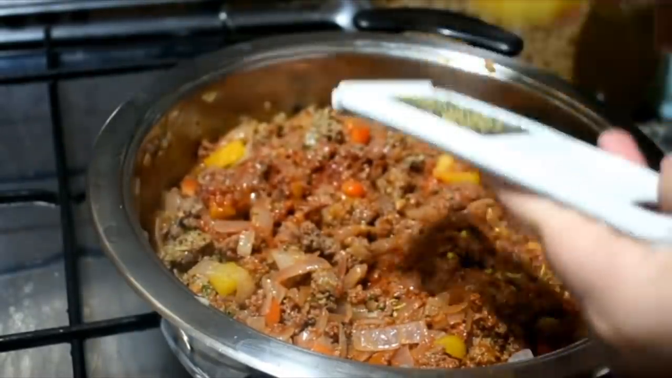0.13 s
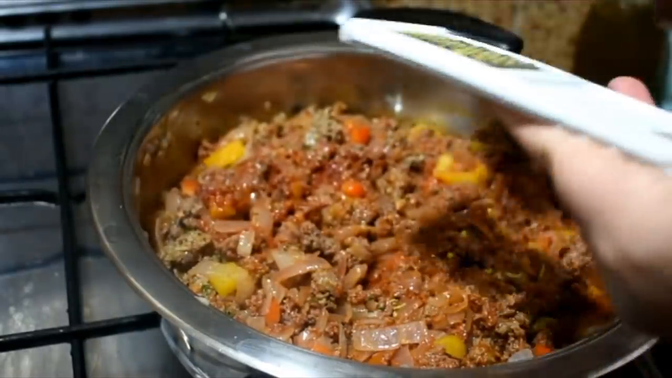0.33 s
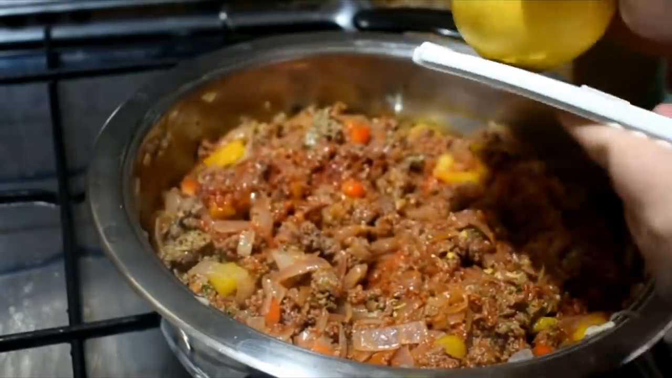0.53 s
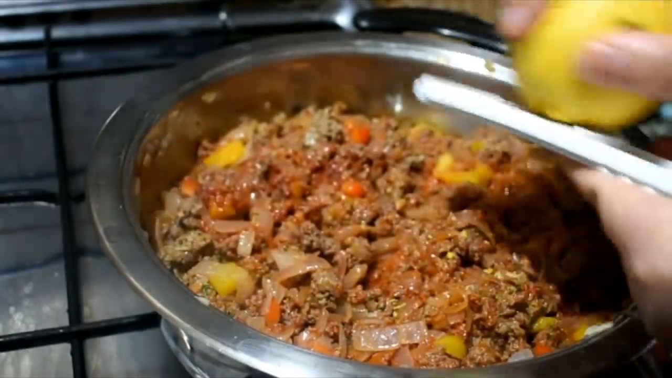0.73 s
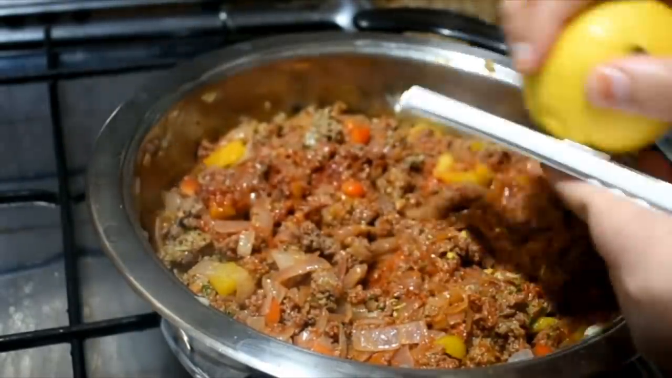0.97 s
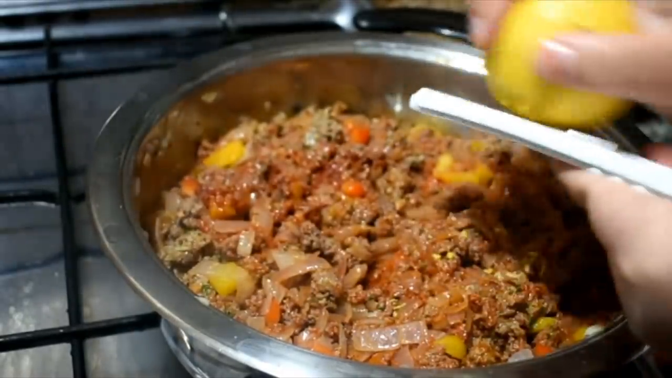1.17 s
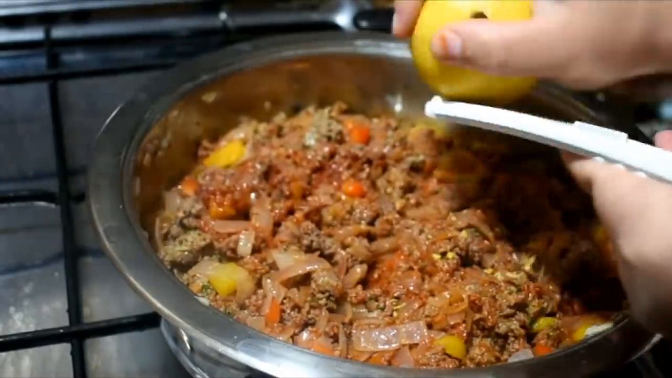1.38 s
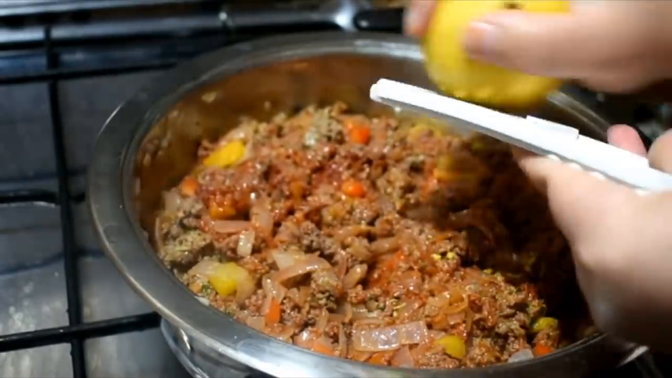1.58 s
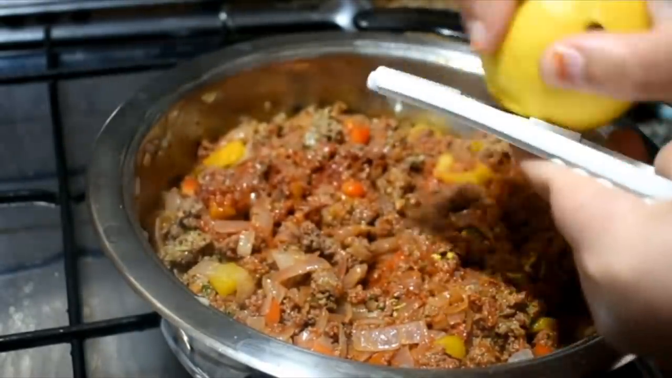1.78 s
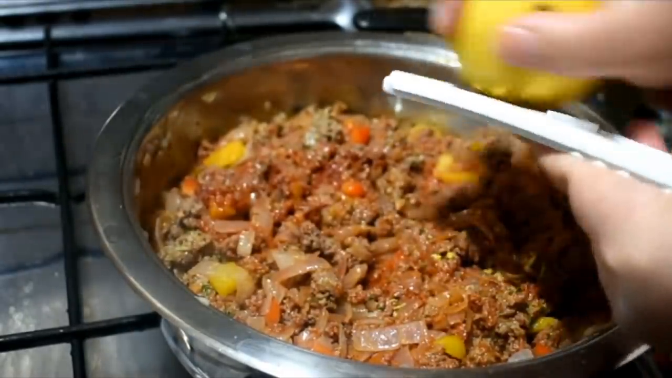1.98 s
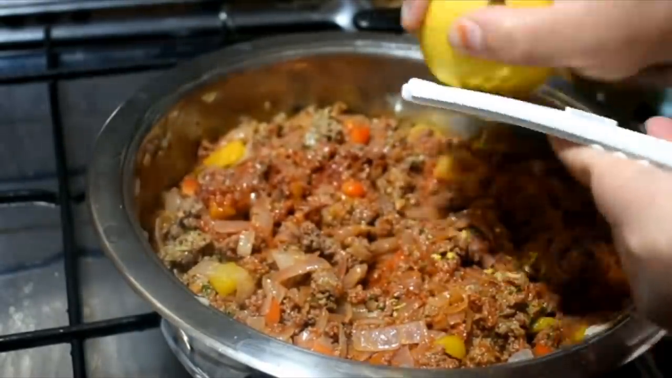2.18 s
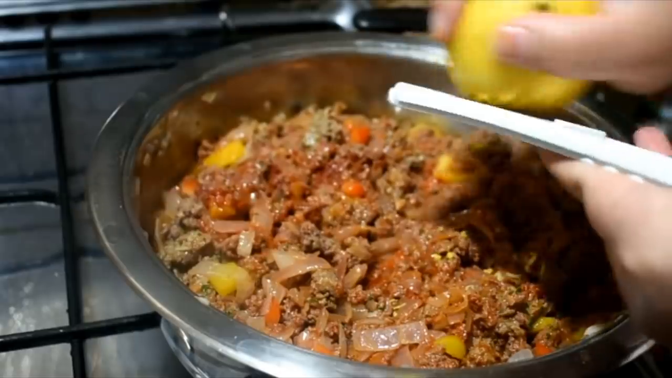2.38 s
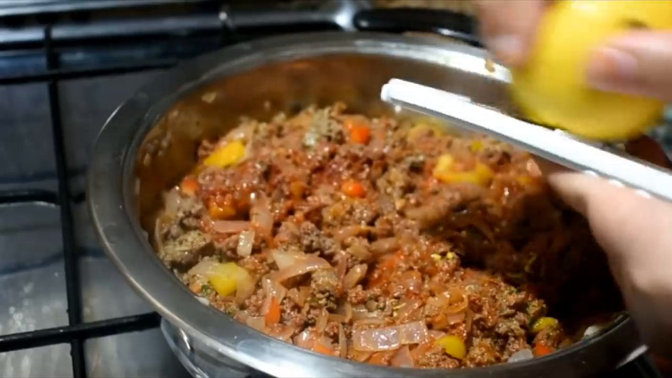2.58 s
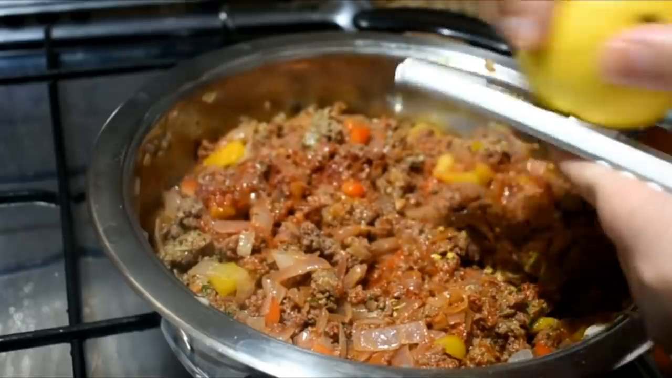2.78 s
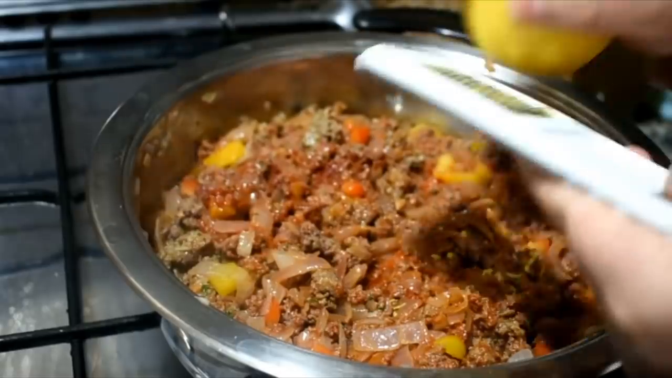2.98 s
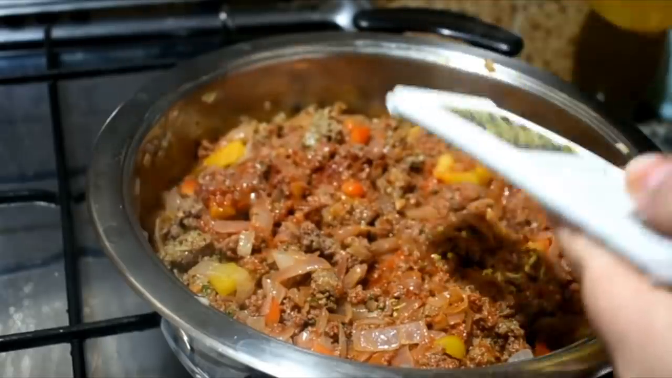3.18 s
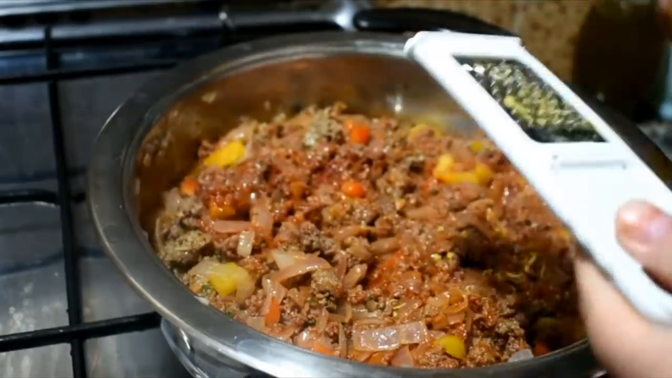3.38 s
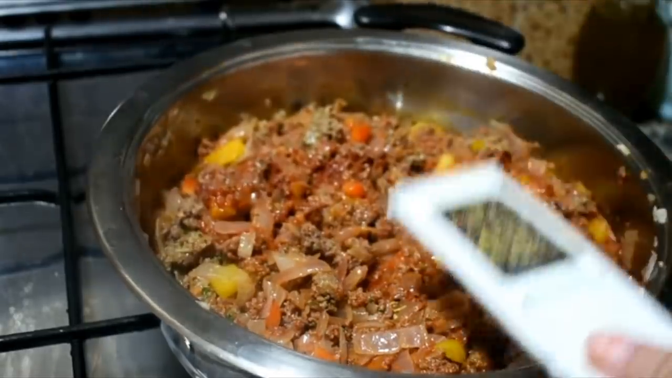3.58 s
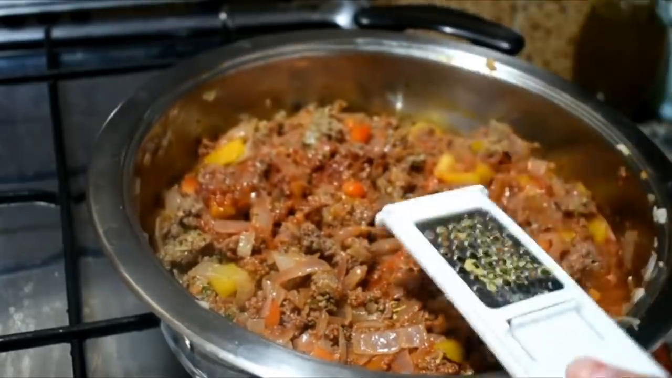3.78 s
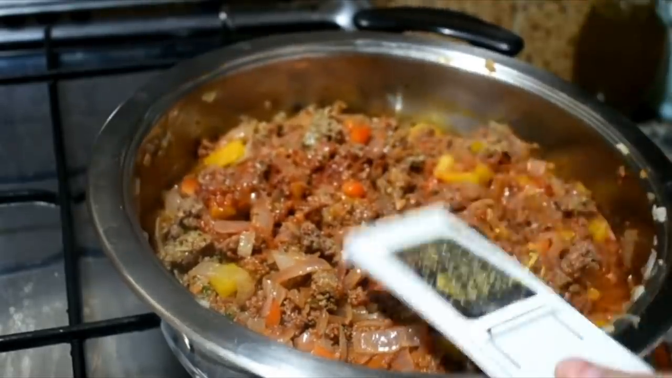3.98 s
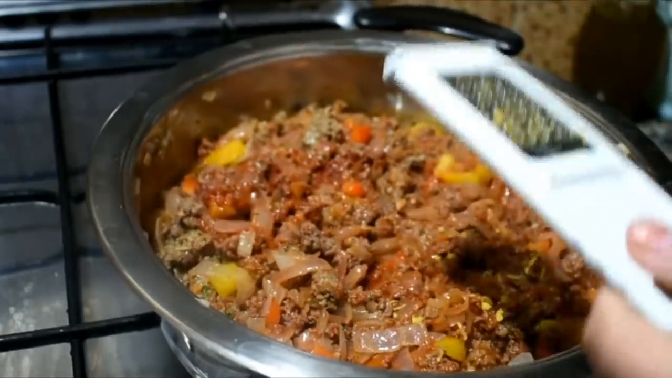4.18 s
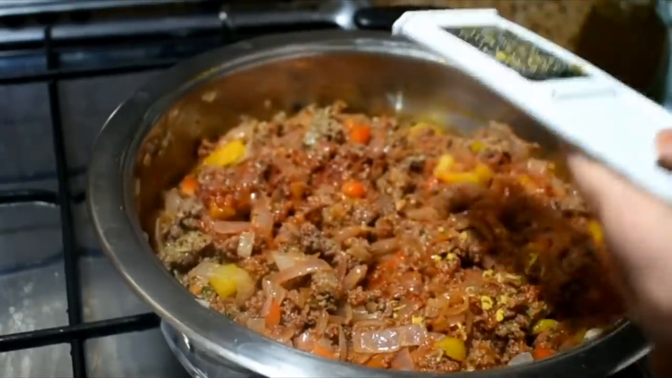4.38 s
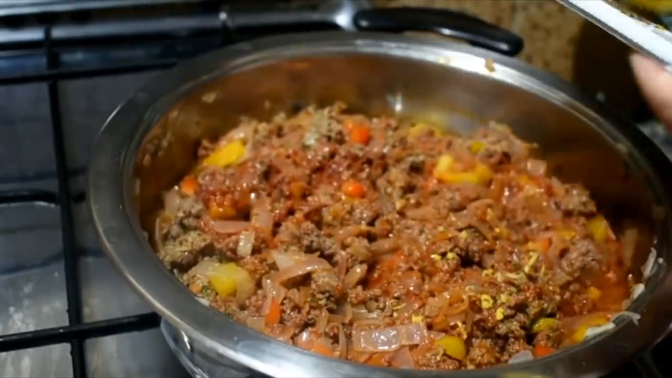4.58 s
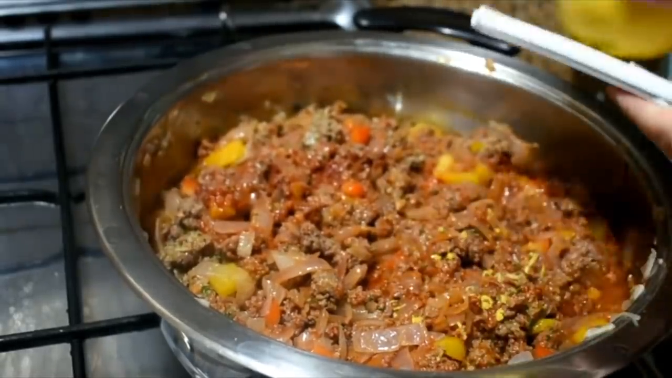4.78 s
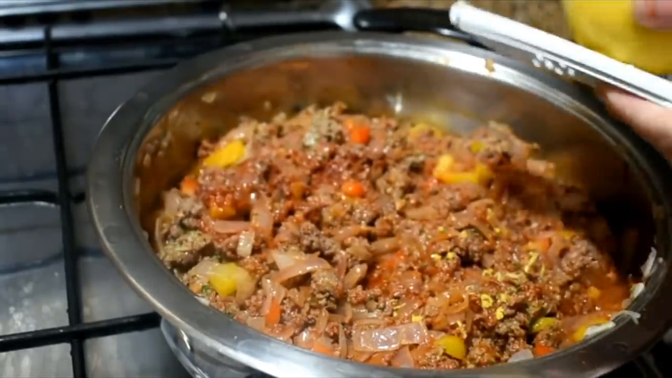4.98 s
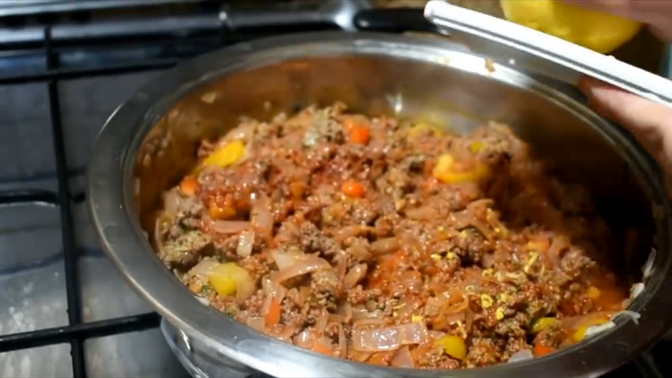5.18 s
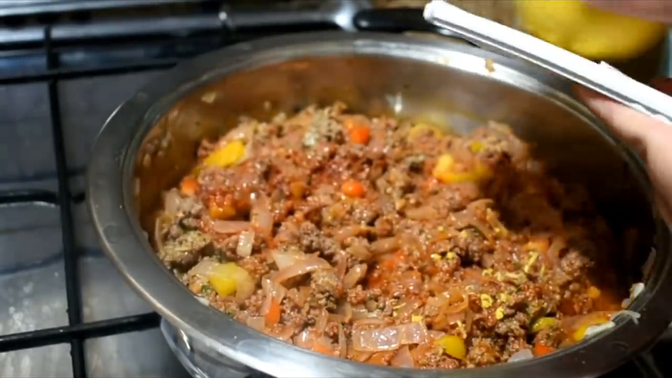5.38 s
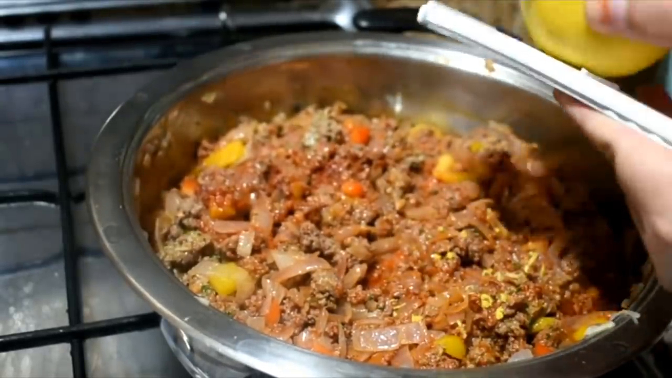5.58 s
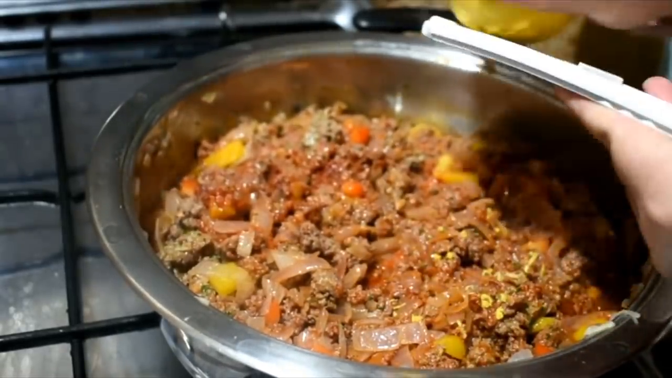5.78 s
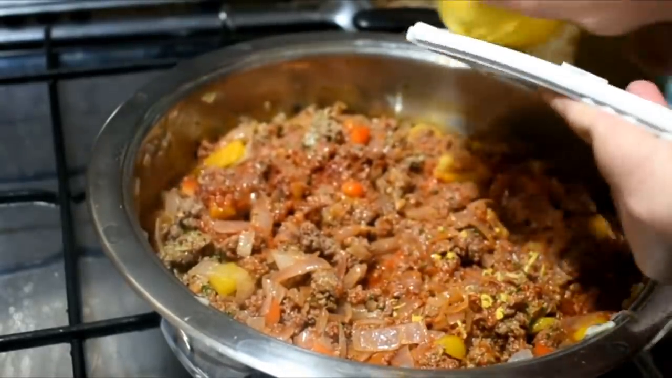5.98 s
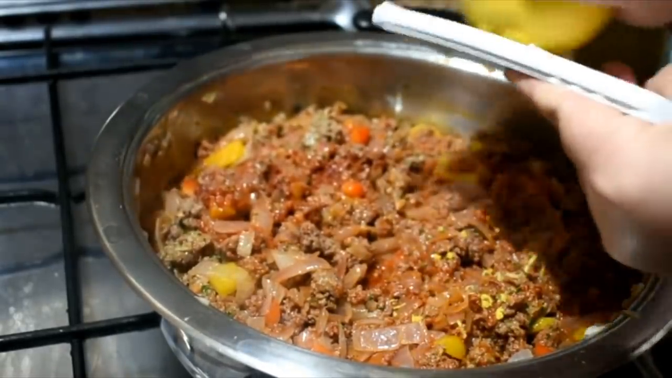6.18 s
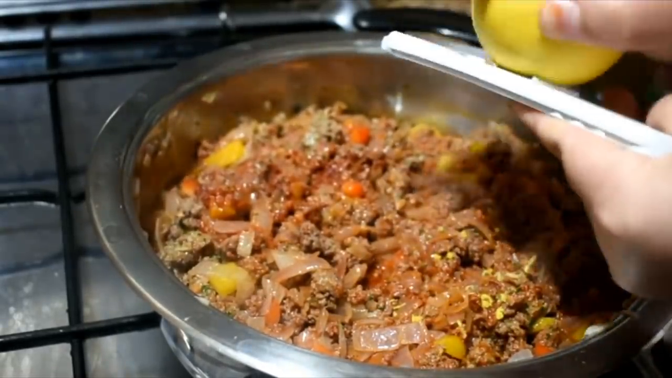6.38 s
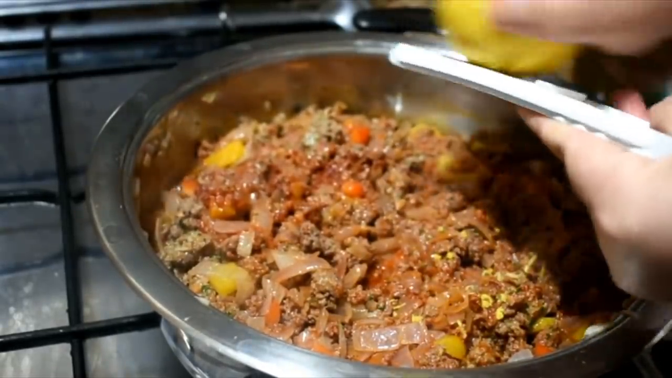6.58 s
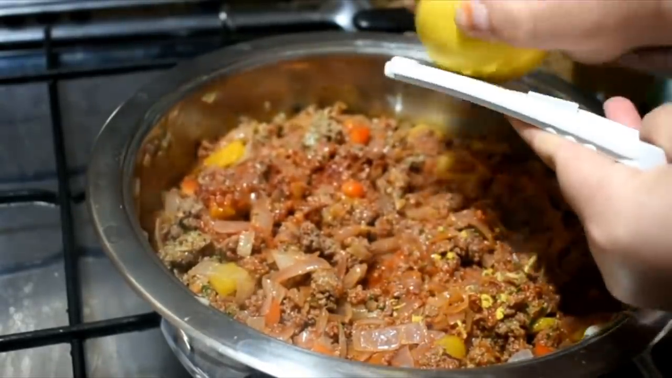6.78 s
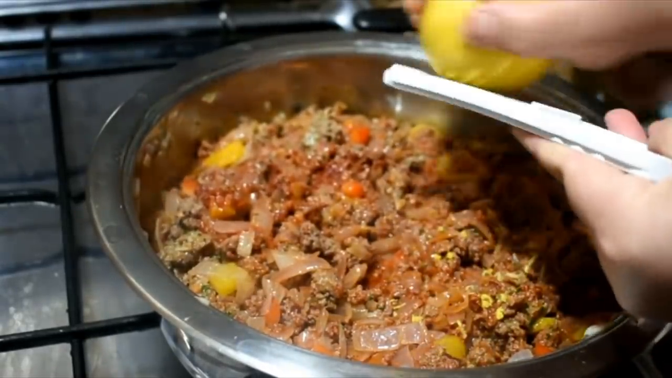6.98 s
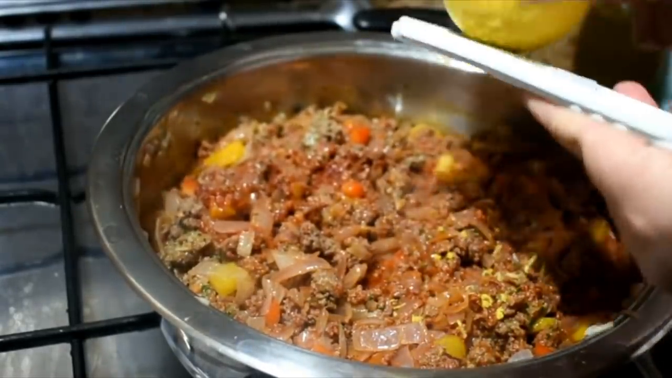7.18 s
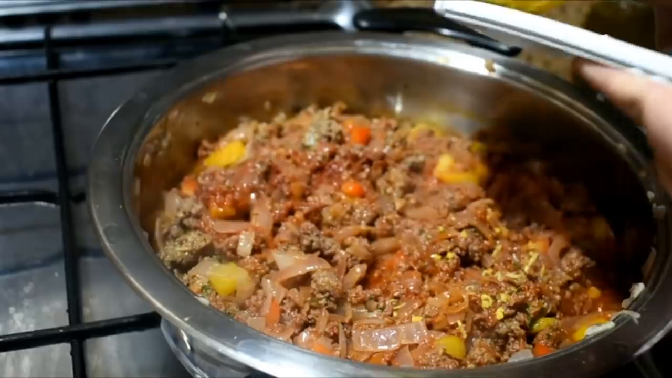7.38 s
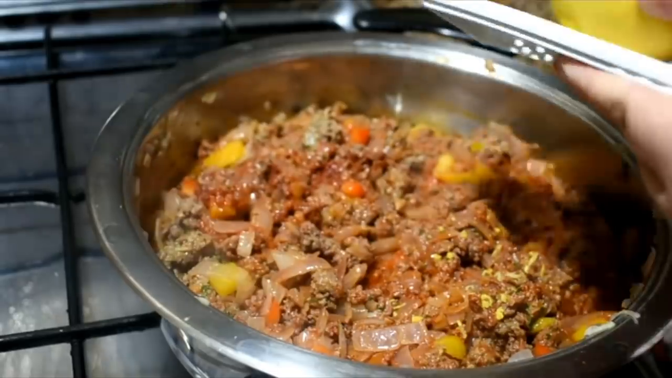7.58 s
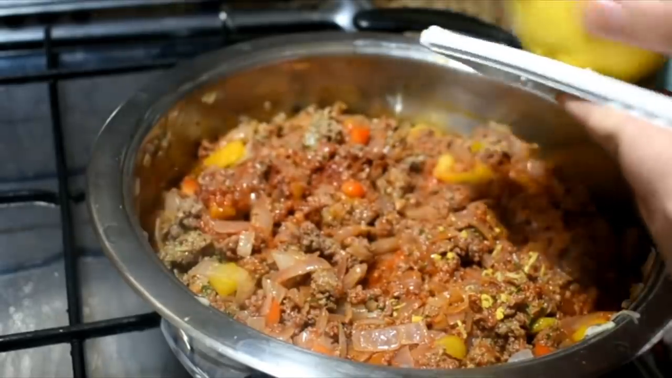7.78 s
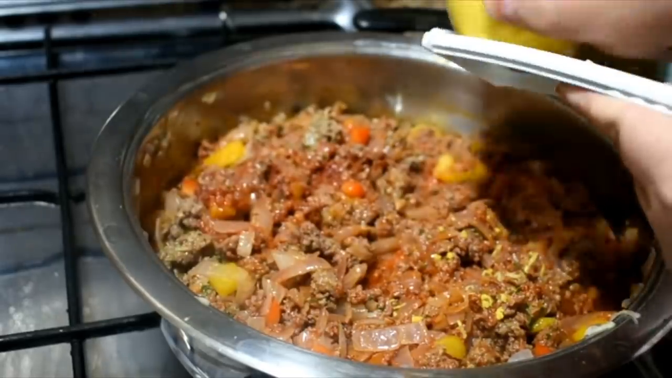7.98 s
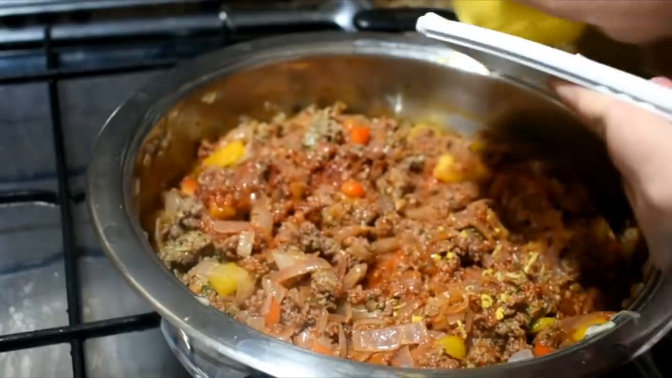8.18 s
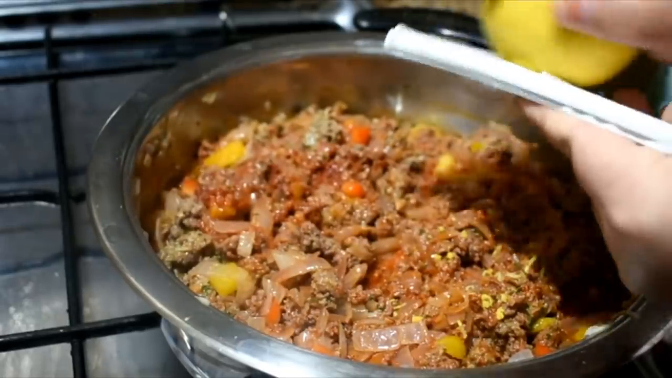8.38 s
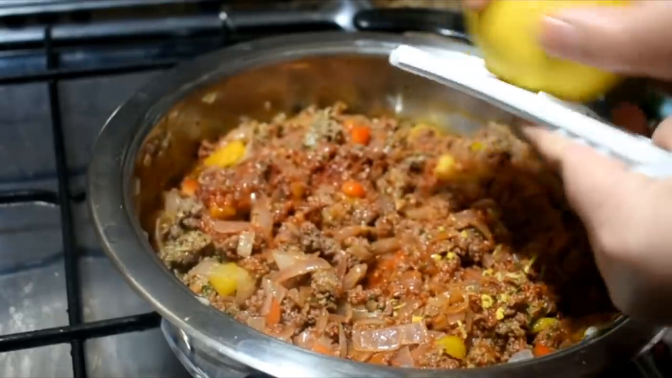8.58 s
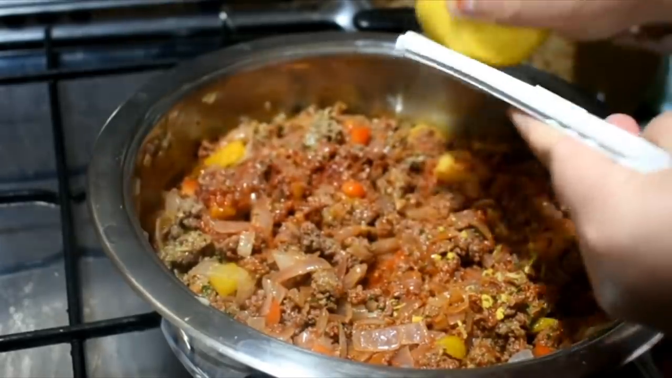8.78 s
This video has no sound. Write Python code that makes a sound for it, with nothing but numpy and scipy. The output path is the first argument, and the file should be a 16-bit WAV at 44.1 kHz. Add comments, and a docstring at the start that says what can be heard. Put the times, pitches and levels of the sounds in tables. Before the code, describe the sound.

A lemon is scraped over a fine handheld grater in quick, crisp strokes, firm pushes with lighter returns. The scraping stops and the grater is rapped three times on the rim of a steel pan, which rings and rocks on the stove grate with dull knocks. Then the zesting resumes, with one short pause, and fades. A faint stove hiss lies beneath, heard close in a small kitchen.

```python
"""Quick, crisp rasps come in bursts: a lemon is zested over a steel pan, firm pushes and lighter returns,
about four pairs a second, each stroke a dense shower of random cuts ringing in the resonances of the blade.
Between bursts the grater is rapped three times on the rim: buzzing noise and ringing modes of the pan, which
rocks on its grate with dull knocks and a late boom of the stove top. Then the zesting resumes.
Beneath lie the filtered noise of the stove hiss, faint pops and wavering fan tones in a small kitchen."""
import sys
import numpy as np
from scipy import signal
from scipy.fft import rfft, irfft
from scipy.io import wavfile
from scipy.ndimage import uniform_filter1d

SR = 44100
rng = np.random.default_rng(int(sys.argv[2]) if len(sys.argv) > 2 else 0)


def to_wav(s):
    """Save 16-bit WAV."""
    ch = np.atleast_2d(s).T  # columns
    pcm = np.round(np.clip(ch, -1, 1) * 32767)  # PCM
    wavfile.write(sys.argv[1], SR, pcm.astype(np.int16))


N = 390108
T = np.arange(N) / SR
RING_TIME = T[:SR]  # one second for each blow to die away

# rasp of the teeth in the peel, spectral outline: (frequency [Hz], level [dB])
RASP_OUTLINE = [(60, -56.5), (250, -29), (600, -15.5), (1200, -7.5), (2000, -3.5), (2900, -3), (3500, -1),
                (5000, -1.5), (6800, -5), (9500, -4.5), (11500, -9), (14000, -12), (15800, -21.5)]
# spells with the lemon on the blade: (start [s], end [s], bite of the low mids [dB],
# sheen of the treble [dB], low-pass corner of the spell [Hz], share of the cycle at which the hand turns back [0-1])
ZEST_SPELLS = [(.25, 2.8, -0.5, 0, 20000, .52), (4.4, 6.66, -3, 3, 15000, .49),
               (7.05, 8.35, -3.5, 0.6, 15500, .47)]
# grater on the pan rim: (time [s], level [dB], buzzing contact [s], ring of the low modes [dB],
# ring of the high modes [dB], chatter of the pan [dB])
RIM_RAPS = [(3.125, -10.5, 0.00906, 1, 2.5, -25), (3.368, -13, 0.012, -1.5, 0.5, -31.5),
            (3.597, -10, 0.0057, -7, -2.5, -22)]


def undb(db):
    """Decibels to gain."""
    return 10 ** (np.asarray(db) / 20)


def unit(x):
    """Scale to rms 1."""
    return x / np.sqrt(np.mean(x ** 2))


def decay(t, t60):
    """Exponential decay, falling by 60 dB in t60 seconds."""
    return np.exp(-np.log(1000) * t / max(t60, 1e-4))


def add(out, s, sound):
    """Mix a sound in at time s, in seconds."""
    i = max(int(s * SR), 0)
    out[i:i + len(sound)] += sound[:len(out) - i]


def colour(x, points, peaks=()):
    """Filter by a (Hz, dB) outline with (Hz, width Hz, dB) resonances standing on it; rms 1."""
    f = np.fft.rfftfreq(len(x), 1 / SR) + 0.0011  # keeps the logarithm finite at 0 Hz
    hz, db = np.transpose(points)
    gain = undb(np.interp(np.log(f), np.log(hz), db))
    body = 1 + sum(undb(d) / (1 + 2j * (f - centre) / width) for centre, width, d in peaks)
    return unit(irfft(rfft(x) * gain * body, len(x)))


def noise(points, count=SR, peaks=()):
    """Coloured noise, rms 1."""
    return colour(rng.standard_normal(count), points, peaks)


def band(x, hz, kind):
    """Gentle low-pass or high-pass without delay."""
    sos = signal.butter(2, min(hz, SR / 2 - 1), kind, fs=SR, output="sos")
    return signal.sosfiltfilt(sos, x, padtype=None)


def walk(rate):
    """Smooth random wander of rms 1, through about rate random values a second."""
    k = max(int(SR / rate), 1)
    steps = np.repeat(rng.standard_normal(N // k + 1), k)
    return unit(uniform_filter1d(steps, k)[:N])


def ring(modes, scatter_db, flutter, flutter_hz):
    """Decaying modes, weighted anew at each blow; loose contact makes each flutter in level and phase."""
    t, out = RING_TIME[:SR * 3 // 5], np.zeros(SR)
    for hz, db, t60 in modes:
        # random pushes on the sine and cosine parts of the mode
        pushes = flutter * rng.standard_normal((2, 128))
        a, b = (np.interp(2 * flutter_hz * t, np.arange(len(p)), p) for p in pushes)
        phase = 2 * np.pi * (hz * t + rng.random())
        swing = ((1 + a) * np.sin(phase) + b * np.cos(phase)) / np.hypot(1, flutter)
        level = undb(db + scatter_db * rng.standard_normal())
        add(out, 0, level * decay(t, t60) * swing)
    return out


def strokes():
    """Pushes and lighter returns; a spell ends on a push.

    Gives (start s, length s, level dB, bite dB, sheen dB, low-pass corner Hz).
    """
    # firm pushes of the lemon along the blade: (start [s], length [s], relative level [dB])
    firm_pushes = [(0.367, .078, -39.5), (.612, .092, -37), (.877, .098, -38), (1.131, .107, -37),
                   (1.426, .086, -35.5), (1.701, .086, -34), (1.95, 0.094, -35), (2.202, 0.096, -34.5),
                   (2.453, 0.079, -36), (4.405, 0.053, -47.5), (4.66, .06, -51), (4.982, 0.085, -41.5),
                   (5.25, .105, -43), (5.519, 0.078, -39), (5.775, 0.085, -35.5), (6.023, .093, -38),
                   (6.277, 0.087, -38), (6.519, .096, -36), (7.054, 0.12, -47), (7.197, 0.1, -36.5),
                   (7.459, .097, -37), (7.718, 0.095, -38.5), (7.984, .11, -37), (8.244, .09, -37)]
    # the way back is lighter than the push before it, with more low mids and treble
    return_s, return_db, return_bite_db, return_sheen_db = .1, -7.5, 4.5, 1.5
    for first, last, bite_db, sheen_db, corner_hz, turn in ZEST_SPELLS:
        pushes = [(s, length, db) for s, length, db in firm_pushes if first < s + length / 2 < last]
        for s, length, db in pushes:
            yield s, length, db, bite_db, sheen_db, corner_hz
        for (s, _, db), (next_s, *_) in zip(pushes, pushes[1:]):
            start = s + turn * (next_s - s)
            bite, sheen = bite_db + return_bite_db, sheen_db + return_sheen_db
            yield start, return_s, db + return_db, bite, sheen, corner_hz


def zesting(cuts_per_s=14000, size_spread_db=2.5, judder_db=1.93, level_db=-2.0,
            blade_shift=0.0236, grip=0.54, skew=0.71, colour_scatter_db=.8):
    """Tiny teeth tear the peel: the faster the lemon slides, the denser the cuts."""
    # nominal resonances of the blade, damped by the fruit: (frequency [Hz], width [Hz], level [dB])
    blade_modes = [(1850, 150, -14), (2520, 163, -11), (3880, 142, -4), (4130, 120, -4.5), (4550, 130, -9),
                   (5520, 200, -12.5), (7600, 250, -14), (8950, 400, -13)]
    out, count = np.zeros(N), SR // 5
    for start, length, db, bite_db, sheen_db, corner_hz in strokes():
        # the hand speeds up quickly and slows down more gently
        progress = np.minimum(T[:count] / length, 1)
        speed = np.abs(np.sin(np.pi * progress ** skew))
        cuts = (rng.random(count) < speed * cuts_per_s / SR) * rng.choice([-1, 1], count)
        cuts = cuts * undb(size_spread_db * rng.standard_normal(count))
        # the fruit loads the blade differently on each pass
        blade = [(hz * (1 + blade_shift * rng.standard_normal()), width, d) for hz, width, d in blade_modes]
        rasp = colour(cuts, RASP_OUTLINE, blade) * np.sqrt(np.mean(speed))
        # deep cuts add low mids, shallow ones a sheen in the treble; no two passes are quite alike
        bite, sheen = band(rasp, 2400, "low"), band(rasp, 6200, "high")
        scatter = colour_scatter_db * rng.standard_normal(2)
        bite_gain, sheen_gain = undb(np.array([bite_db, sheen_db]) + scatter)
        rasp = rasp + (bite_gain - 1) * bite + (sheen_gain - 1) * sheen
        rasp = band(rasp, corner_hz, "low")
        add(out, start, undb(db) * rasp * speed ** grip)
    # the dimpled peel grips and slips
    return out * undb(level_db + judder_db * walk(300))


def snag_ping(db, hz, ping_db=13, ping_width_hz=600, t60=0.041):
    """A tooth springs free: a short burst of rasp noise with one strong resonance."""
    count = SR // 8
    burst = noise(RASP_OUTLINE, count=count, peaks=[(hz, ping_width_hz, ping_db)])
    return undb(db) * burst * decay(T[:count], t60)


def snags(small_db=-45, small_share=.3, low_hz=3500, high_hz=10000):
    """Single teeth flick free of the peel, without bass; small snags come by chance early in a stroke."""
    # a tooth snags hard and lets go: (time [s], level [dB], ping [Hz])
    hard_snags = [(.022, -41, 2150), (.952, -32, 9350), (1.139, -37, 4260), (1.342, -33.5, 4230),
                  (1.708, -36.5, 10300), (2.211, -34, 6230), (2.466, -34, 9000), (5.781, -39, 3900),
                  (6.531, -35.5, 3970)]
    out = np.zeros(N)
    for s, db, hz in hard_snags:
        add(out, s, snag_ping(db, hz))
    for start, length, *_ in strokes():
        caught, place, pitch = rng.random() < small_share, rng.random(), rng.random()
        hz = low_hz * (high_hz / low_hz) ** pitch
        add(out, start + place * length / 2, caught * snag_ping(small_db, hz))
    return band(out, 400, "high")


def rubbing(level_db=-58, unsteady_db=0.5):
    """Between strokes the lemon stays on the blade and rustles as it is turned: soft, unsteady rasp noise."""
    touch = sum((T > start) & (T < end) for start, end, *_ in ZEST_SPELLS)
    touch = uniform_filter1d(touch.astype(float), SR // 20)
    return noise(RASP_OUTLINE, count=N) * touch * undb(level_db + unsteady_db * walk(13))


def raps(release_t60=0.037, clash_db=0.5, ring_db=-1, rise_s=0.0021):
    """The grater buzzes against the rim for an instant, then the pan rings on, its close modes beating."""
    # clash of the contact, spectral outline: (frequency [Hz], level [dB])
    clash_outline = [(88, -77), (150, -49), (1180, -16), (1500, -21.5), (1850, -10), (2120, -18),
                     (2840, -10), (3200, -2), (4370, -15.5), (6080, -13), (6570, -13), (9160, -13),
                     (13000, -20.5), (15800, -32)]
    # modes of the steel pan: (frequency [Hz], relative level [dB], t60 [s])
    pan_modes = [(588, -24.5, 0.35), (762, -28, .35), (1102, -19, 0.25), (1250, -18, 0.2),
                 (1465.5, -20.5, 0.61), (1869, -8, 0.35), (1893, -11, .35), (2367, -20, 0.35),
                 (2387, -18.5, 0.35), (2550, -19.5, 0.2), (2950, -19, .22), (3136, -1, 0.12),
                 (3227, -7.5, .27), (3280, -16, .16), (3470, -17, 0.16), (3645, -19, .2), (3980, -21, 0.14),
                 (4086, -23, .2), (4697, -19.5, .24), (5900, -10, .15), (5966, -17.5, 0.18),
                 (6160, -11, 0.229), (7210, -19.5, 0.24), (7970, -19.5, 0.32), (8950, -24, .22),
                 (9900, -26, .13), (11194, -26.5, .25), (11999, -26, .2), (12510, -26, .18)]
    out, t = np.zeros(N), RING_TIME
    for s, db, contact, low_db, high_db, _ in RIM_RAPS:
        clash = noise(clash_outline) * decay(np.maximum(t - contact, 0), release_t60)
        modes = [(hz, d + (low_db if hz < 2200 else high_db), t60) for hz, d, t60 in pan_modes]
        ringing = ring(modes, scatter_db=1.0, flutter=0.69, flutter_hz=71.4)
        blow = undb(clash_db) * clash + undb(ring_db) * ringing
        add(out, s, undb(db) * blow * np.minimum(t / rise_s, 1) ** .5)
    # thin steel radiates little bass
    return band(out, 200, "high")


def pan_blows(count=3, bounce_s=.031, fall_db=-2.5, soften_db=-7.5, bounce_ring_db=-11.5,
              hardness_slope=0.9, neutral_drop_db=-29.5):
    """Choked bounces after each rap, each weaker and softer, and free drops, harder when heavier.

    Gives (time s, level dB, ring of the grate dB, hardness of the treble dB).
    """
    # the tipped pan drops back on the grate: (time [s], level [dB])
    pan_drops = [(3.295, -30.5), (3.517, -27.5), (3.566, -36), (3.719, -23.5), (4.087, -37), (4.592, -45),
                 (4.822, -48)]
    for s, *_, chatter_db in RIM_RAPS:
        for k in range(count):
            yield s + (k + 1) * bounce_s, chatter_db + k * fall_db, bounce_ring_db, k * soften_db
    for s, db in pan_drops:
        # dB of treble per dB of level above the neutral drop
        yield s, db, 0, hardness_slope * (db - neutral_drop_db)


def clunks(knock_t60=0.13, knock_db=-2, ring_db=-1, rise_s=0.0016, impact_db=3, impact_t60=0.057):
    """The pan knocks on the iron grate, which rings briefly; the first instant of contact stands out."""
    # dull knock of steel on iron, spectral outline: (frequency [Hz], level [dB])
    knock_outline = [(100, -31.5), (250, -13), (500, -7), (900, -2.5), (1600, 2), (2700, -5.5),
                     (4000, -7.5), (7000, -16), (15000, -40.5)]
    # modes of the grate under the pan: (frequency [Hz], relative level [dB], t60 [s])
    grate_modes = [(266, -21, 0.89), (794, -11, 0.27), (918, -3, 0.15), (1134, -14, 0.12),
                   (1332, -11, 0.26), (1564, -8, 0.324), (1830, -12.5, .15), (2120, -12.5, 0.19),
                   (2437, -3.5, .12), (2619, 0.5, 0.093), (2680, 1, 0.1), (2830, -14, .15),
                   (3210, -5, 0.17)]
    out, t = np.zeros(N), RING_TIME
    impact = 1 + (undb(impact_db) - 1) * decay(t, impact_t60)
    for s, db, grate_db, hard_db in pan_blows():
        knock = noise(knock_outline) * decay(t, knock_t60)
        knock = knock + (undb(hard_db) - 1) * band(knock, 2400, "high")
        ringing = ring(grate_modes, scatter_db=1.0, flutter=.6, flutter_hz=55.6)
        blow = undb(knock_db) * knock + undb(ring_db + grate_db) * ringing
        add(out, s, undb(db) * blow * impact * np.minimum(t / rise_s, 1))
    return out


def boom(rap_db=-27, clunk_db=-12, swell_s=0.048, t60=0.72, rattle_db=1.0):
    """Every blow feeds the sheet-metal stove top, whose lows build late, rattle unevenly and linger."""
    # boom shaken through the grate, spectral outline: (frequency [Hz], level [dB])
    boom_outline = [(30, -33), (80, -26), (130, -8.5), (190, -2.5), (255, 1), (340, 0.5), (450, -5.5),
                    (700, -0.5), (1200, -5), (2500, -31)]
    # panel resonances of the stove top: (frequency [Hz], width [Hz], level [dB])
    panel_modes = [(225, 14, -3.5), (266.8, 15, 7), (327, 18, -0.5), (662, 15, 1), (739, 24, -0.5)]
    power, t = np.zeros(N), RING_TIME
    swell = (1 - np.exp(-t / swell_s)) * decay(t, t60)
    for blows, share_db in ((RIM_RAPS, rap_db), (pan_blows(), clunk_db)):
        for s, db, *_ in blows:
            add(power, s, (undb(db + share_db) * swell) ** 2)
    rumble = noise(boom_outline, count=N, peaks=panel_modes)
    return np.sqrt(power) * rumble * undb(rattle_db * walk(90))


def stove_hiss(level_db=-50.13, flutter_db=1.52):
    """The stove hisses steadily: coloured noise with a slight flutter in level."""
    # stove and fan noise, spectral outline: (frequency [Hz], level [dB])
    hiss_outline = [(25, -37), (65, -33), (100, -21.5), (180, -16), (220, -4), (330, -4), (420, -8),
                    (600, -1.5), (850, -0.5), (1400, -2), (2500, -5), (4500, -7.5), (9500, -13),
                    (15500, -27.5)]
    return noise(hiss_outline, count=N) * undb(level_db + flutter_db * walk(25))


def simmering(pops_per_s=40, level_db=-70):
    """Faint pops of the simmering food: sparse random clicks with a short diffuse tail."""
    pops = (rng.random(N) < pops_per_s / SR) * rng.standard_normal(N)
    simmer = kitchen(colour(pops, RASP_OUTLINE), wet_db=-2.0, t60_low=0.11, t60_high=0.03)
    return undb(level_db) * simmer


def fan_whine(waver_db=1.3, drift_hz=1.18):
    """Mains hum and fan tones: sines that waver in level and drift in pitch."""
    # tones about which level and pitch wander: (frequency [Hz], rms level [dB])
    fan_tones = [(100, -86.5), (215, -78.5), (829, -62), (985, -76.5), (1240, -67), (1427, -76.5)]
    tones = np.zeros(N)
    for hz, db in fan_tones:
        phase = 2 * np.pi * np.cumsum(hz + drift_hz * walk(11)) / SR
        tones += undb(db + waver_db * walk(6)) * np.sin(phase)
    return np.sqrt(2) * tones  # rms to peak


def nearby(x, echo_db, count=14):
    """Early echoes off the pan, hob and wall, a few milliseconds late, ripple the spectrum."""
    response = np.zeros(SR // 50)
    lags = (rng.uniform(.001, .007, count) * SR).astype(int)
    response[lags] = undb(echo_db) * rng.choice([-1, 1], count) / np.sqrt(count)
    response[0] = 1
    return signal.fftconvolve(x, response / np.linalg.norm(response))[:N]


def kitchen(x, wet_db, t60_low, t60_high):
    """Direct sound plus a diffuse noise tail whose treble dies first."""
    t, air = RING_TIME, rng.standard_normal(SR)
    low = band(air, 3500, "low")
    tail = low * decay(t, t60_low) + (air - low) * decay(t, t60_high)
    tail = tail * np.clip(t / 0.01, 0, 1) ** 2  # builds up over 10 ms
    return x + undb(wet_db) * signal.fftconvolve(x, tail / np.sqrt(np.sum(tail ** 2)))[:N]


def scene():
    """Grater, pan and stove in one small room."""
    peel = zesting() + snags() + rubbing()
    grating = kitchen(nearby(peel, echo_db=-10), wet_db=-13.0, t60_low=0.41, t60_high=.4)
    knocks = kitchen(raps() + clunks(), wet_db=-9.0, t60_low=0.521, t60_high=0.318)
    background = stove_hiss() + simmering() + fan_whine()
    return (grating + knocks + boom() + background)[None]


def record(dry):
    """The sound fades at the end and a steep low-pass cuts the top."""
    # closing fade: (time [s], level [dB])
    closing_fade = [(8.0, -2.5), (8.25, -4.5), (8.45, -7), (8.778, -11), (8.795, -61.5)]
    top_hz = 15800
    faded = dry * undb(np.interp(T, *np.transpose(closing_fade)))
    return signal.sosfilt(signal.ellip(10, .2, 80, top_hz, fs=SR, output="sos"), faded)


dry = scene()
out = record(dry)
to_wav(out)
```